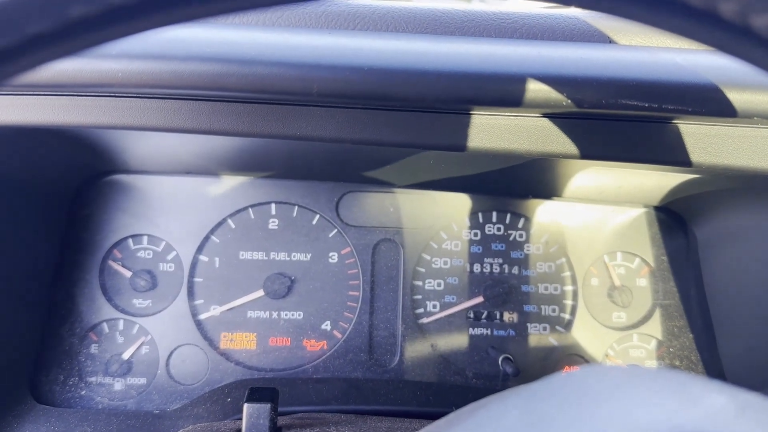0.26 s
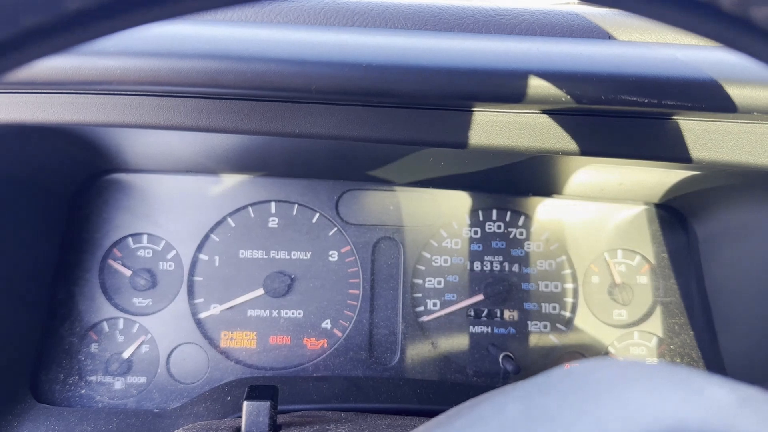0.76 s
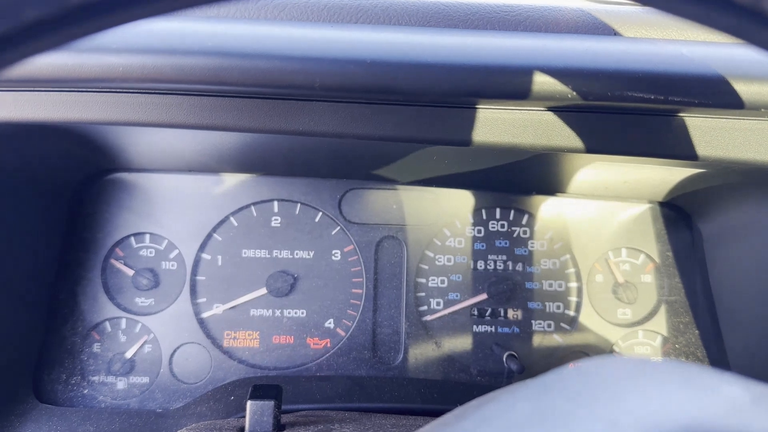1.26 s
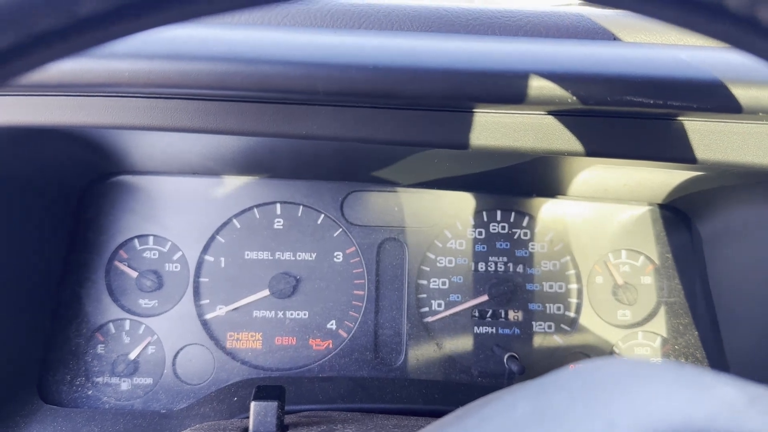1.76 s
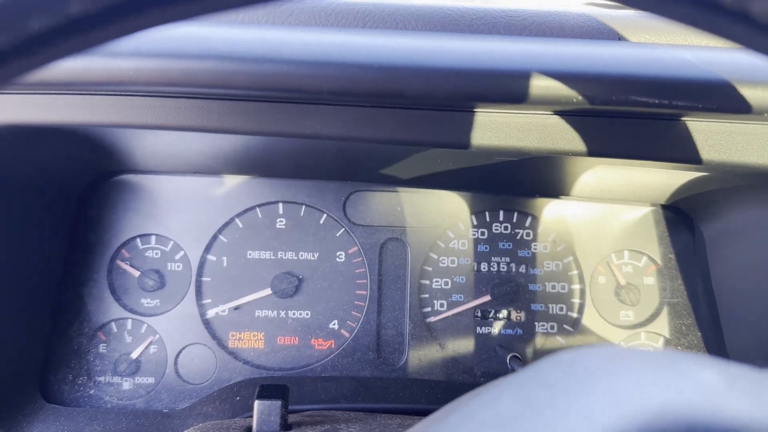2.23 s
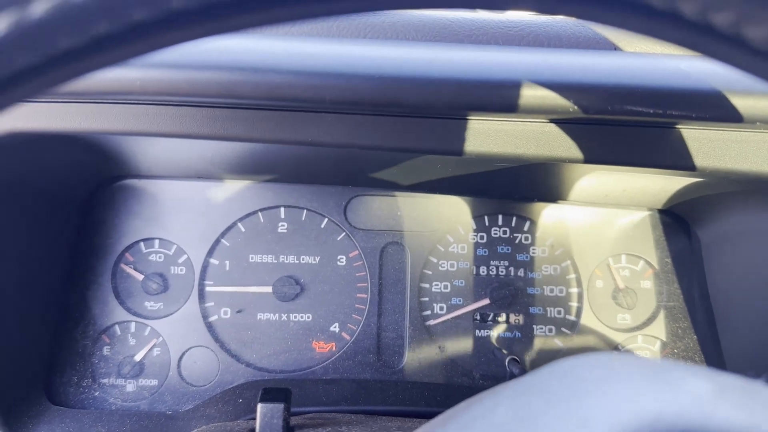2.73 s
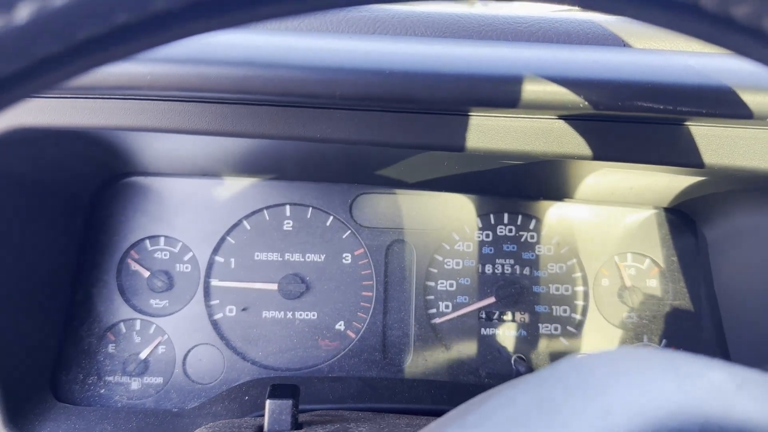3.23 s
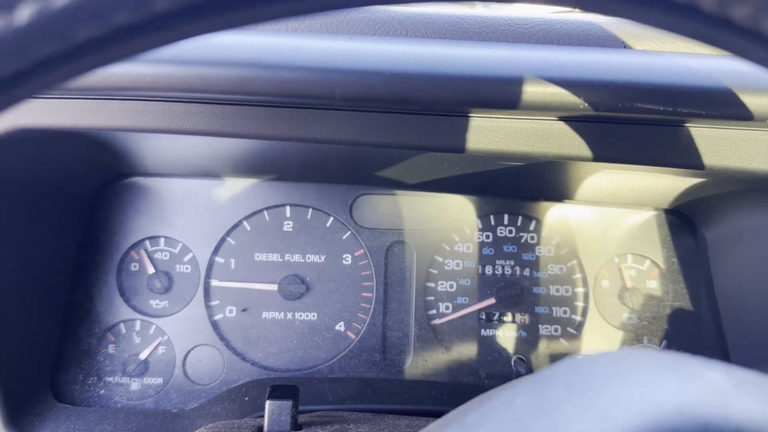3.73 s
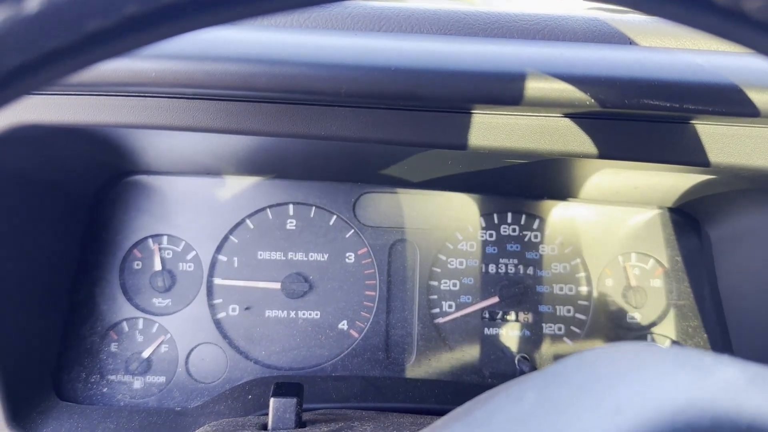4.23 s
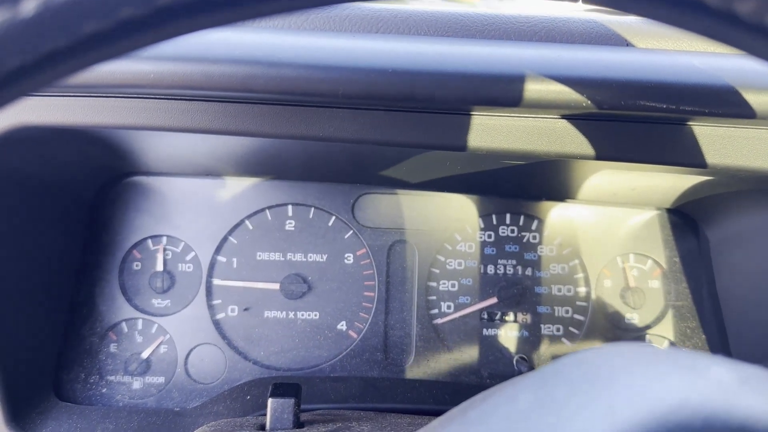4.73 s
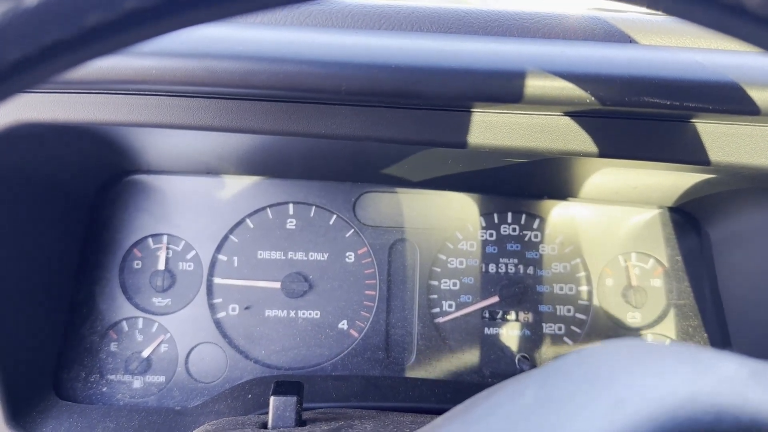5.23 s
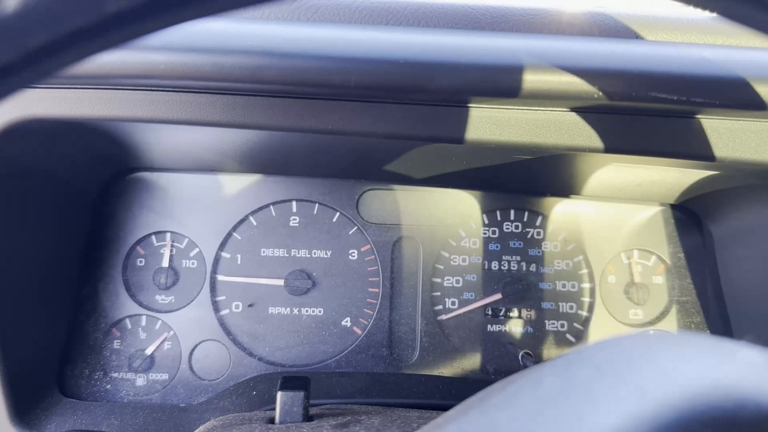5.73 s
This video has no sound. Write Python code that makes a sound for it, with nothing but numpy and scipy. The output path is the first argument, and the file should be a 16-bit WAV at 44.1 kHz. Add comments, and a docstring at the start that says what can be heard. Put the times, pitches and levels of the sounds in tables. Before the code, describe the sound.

Inside a truck cab, a key clicks, the starter grinds, and a diesel engine catches and settles into a steady, clattering idle.

```python
"""Diesel start from the cab

A quiet truck cab, birds outside. The key clicks round, the starter gear grinds against each compression,
a six-cylinder diesel catches with a few hard blows and settles to an even idle. Firings ring the cab's
modes; clatter and hiss come through the firewall to a pair of microphone ports."""
import sys
import numpy as np
from scipy import signal
from scipy.fft import rfft, irfft, next_fast_len
from scipy.io import wavfile
from scipy.ndimage import uniform_filter1d

SR = 44100
rng = np.random.default_rng(int(sys.argv[2]) if len(sys.argv) > 2 else 0)


def output_pcm(signal):
    """Save a mono or channel-first signal as 16-bit PCM at the path in sys.argv[1].

    Samples are clipped to [-1, 1] before scaling.
    """
    pcm = np.clip(np.atleast_2d(signal).T, -1, 1) * 32767
    wavfile.write(sys.argv[1], SR, np.round(pcm).astype(np.int16))


N = 263718
T = np.arange(N) / SR

# first uneven firings: t/s, level/dB
CATCH = [(2.108, -5), (2.16, 2), (2.203, 3.5), (2.225, 2), (2.245, -6), (2.266, 0.5), (2.297, 3.5),
         (2.327, -5), (2.366, 2)]
# idle speed: t/s, firing rate/Hz
IDLE = [(2.441, 32.63), (3.2, 33.04), (4.1, 33.0), (4.9, 33.155), (5.98, 33.162)]
# cylinders in firing order: cab blow/dB, dash blow/dB, clatter/dB
CYLINDERS = [(3, 2, -2), (2.1, 3.5, -7), (3.5, -5.5, 0.5), (0, 3.5, 0), (5.5, -1, -3), (0, -5.5, -0.5)]
FIRE_S, IDLE_S = 2.11, IDLE[0][0]

def engine():
    """Six cylinders catch, then idle; each firing pulses the cab, the dash and the clatter."""
    rate_hz = np.interp(T, *np.transpose(IDLE))
    firings = np.cumsum(rate_hz * (T >= IDLE_S)) / SR
    count = np.floor(firings - 1e-9).astype(int)
    at = np.flatnonzero(np.diff(count)) + 1
    spread_db = np.array([.5, .7, 1.2]) * rng.standard_normal((len(at), 3))
    pulses = np.zeros((3, N))
    pulses[:, at] = amp(np.array(CYLINDERS)[count[at] % 6] + spread_db).T
    for s, db in CATCH:
        pulses[:, round(s * SR)] = amp(db)
    cab_blows, dash_blows, clatter_blows = pulses
    body = thump(cab_blows, dash_blows, idle_mean=dash_blows[at].mean())
    noise = combustion(clatter_blows, cycles=np.cumsum(rate_hz) / SR / 6)
    return body + noise + valve_taps(firings) + bark()


# cab, dash and floor pan modes: f/Hz, width/Hz, gain/dB
CAB_MODES = [(70.04, 13.2, -20.5), (99.84, 10.4, -26), (134.52, 1.9, -27.5), (174.4, 11.8, -33.5),
             (198, 7.1, -43.5), (235.8, 18, -44.5)]
DASH_MODES = [(372, 2.3, -42.5), (399.3, 2.85, -39.5)]
FLOOR_MODES = [(86, 7, -22), (181, 7, -31)]
THUMP_DB = -18.5

def thump(cab_blows, dash_blows, idle_mean):
    """Firings ring cab and dash; only their unevenness rings the floor pan."""
    uneven = dash_blows - (dash_blows > 0) * idle_mean
    body = ring(cab_blows, CAB_MODES) + ring(dash_blows, DASH_MODES) + ring(uneven, FLOOR_MODES)
    return amp(THUMP_DB) * body


# clatter and hiss spectra: f/Hz, relative density/dB
CLATTER_SPECTRUM = [(71, -29.5), (120, -4), (268, -17.5), (396, -16.5), (541, -24), (680, -22),
                    (975, -26.5), (1090, -25), (1250, -26.5), (1940, -26.5), (3170, -38), (6000, -53),
                    (7800, -75)]
HISS_SPECTRUM = [(2350, -7), (4000, -3.5), (5110, -3.5), (6140, -8.5), (7120, -3), (8600, -9), (10400, -7),
                 (15700, -12)]
# panel resonances: f/Hz, width/Hz, boost/dB
PANELS = [(395, 40, 4.5), (684, 36, 5), (805, 16, 4), (1115, 45, 6), (1550, 55, 4.5), (1900, 150, 5),
          (2310, 40, 5.5), (2570, 70, 6), (5030, 110, 6), (6860, 130, 2)]
# noise flares at the catch: t/s, clatter/dB, hiss/dB
FLARES = [(2.25, -26, -42.5), (2.38, -33, -45)]
CLATTER_DB, HISS_DB, KNOCK_DB = -30, -52, -24.5
CLATTER_FADE_DB_PER_S, HISS_FADE_DB_PER_S = 0.86, 2.5  # noise eases as oil pressure builds

def combustion(blows, cycles):
    """Each firing opens a burst of clatter and hiss; the first ones also knock hard."""
    flare_s, clatter_db, hiss_db = np.transpose(FLARES)
    clatter_gain = flare(flare_s, clatter_db, CLATTER_DB, CLATTER_FADE_DB_PER_S)
    hiss_gain = flare(flare_s, hiss_db, HISS_DB, HISS_FADE_DB_PER_S)
    bursts = decay(blows, tau_s=0.044)
    beat = (1.146 + bursts) / np.sqrt(uniform_filter1d((0.5 + bursts) ** 2, size=8000))
    clatter = clatter_gain * colour(beat * grit(0.37, cycles), CLATTER_SPECTRUM, PANELS[:-1])
    hiss = hiss_gain * colour((6.4 + beat) / 5 * grit(0.75), HISS_SPECTRUM, PANELS[-2:])
    first_bursts = decay(blows * (T < IDLE_S), tau_s=0.01)
    knock = amp(KNOCK_DB) * colour(first_bursts * grit(2.0), CLATTER_SPECTRUM[2:], PANELS[:-1])
    running = swell(FIRE_S, 0, rise_db_per_s=280, fall_db_per_s=0)
    return knock + running * (clatter + hiss)


def flare(times_s, peaks_db, idle_db, fade_db_per_s, rise_db_per_s=54, fall_db_per_s=145):
    """Engine noise gain: brief flares, then a slow fade from the idle level."""
    power = sum(swell(s, db, rise_db_per_s, fall_db_per_s) ** 2 for s, db in zip(times_s, peaks_db))
    idle = swell(times_s[-1], idle_db, rise_db_per_s, fade_db_per_s)
    return np.sqrt(power + idle ** 2)


# bark modes: f/Hz, width/Hz, level/dB
BARK_MODES = [(203, 40, -18), (900, 200, -23)]

def bark():
    """The first firing rings two short modes."""
    return strike(times_s=2.113, db=0, modes=BARK_MODES)


# valve taps: place in cycle/firings, f/Hz, level/dB
TAPS = [(.3, 1920, -39), (.15, 1130, -41), (2.05, 695, -36), (5.45, 1550, -41)]
TAP_WIDTH_HZ = 30

def valve_taps(firings):
    """Each valve gear tap rings once a cycle and fades with the clatter."""
    out = np.zeros(N)
    for place, hz, db in TAPS:
        times_s = T[np.flatnonzero(np.diff(np.floor((firings - place) / 6)))]
        tap_db = db - CLATTER_FADE_DB_PER_S * (times_s - FIRE_S) + 2.5 * rng.standard_normal(len(times_s))
        out += strike(times_s, tap_db, [(hz, TAP_WIDTH_HZ, 0)])
    return out


# pinion ring on meshing: f/Hz, width/Hz, level/dB
PINION_MODES = [(4570, 42, -40)]
ENGAGE_S, RELEASE_S = .933, 2.2

def starter():
    """The pinion meshes with a ping, then grinds and whines until let go."""
    meshed = swell(ENGAGE_S, 0, rise_db_per_s=916, fall_db_per_s=0)
    meshed *= np.clip((RELEASE_S - T) / 0.011, 0, 1)
    load = meshed * swell(s=1.235, db=-39.5, rise_db_per_s=16, fall_db_per_s=260)
    return grind(meshed, load) + whine(load) + strike(ENGAGE_S, 0, PINION_MODES)


# compression strokes: t/s, level/dB, hold/s
STROKES = [(0.929, -42, 0.403), (1.358, -33, 0.057), (1.502, -32.5, 0.051), (1.639, -31.5, 0.036),
           (1.762, -31.5, 0.04), (1.883, -32.5, 0.046), (2.014, -39, 0.03)]
# gear noise: f/Hz, relative density/dB
GRIND_SPECTRUM = [(180, -25.5), (300, -10.5), (397, -2), (530, -18.5), (621, -1.5), (1020, -8.5),
                  (1150, -5), (1310, -12.5), (1680, -5), (1820, -7), (3090, -16.5), (4920, -16.5),
                  (5710, -24.5), (10700, -30), (15700, -30.5)]
# bell housing resonances: f/Hz, width/Hz, boost/dB
HOUSING = [(578, 34, 5), (1110, 30, -3), (1574, 73, 6.5), (1993, 100, 7.5), (5050, 97, 9), (10050, 2100, 7)]
# ring at a stroke's hardest point: f/Hz, width/Hz, level re stroke/dB
CRUNCH_MODES = [(1653, 48, 3), (2030, 74, 0), (4950, 130, -13)]
# slack taken up as a stroke starts: f/Hz, width/Hz, gain/dB
CLACK_MODES = [(627, 40, -3), (1120, 33, -10)]
DRAG_DB, LABOUR_GAIN_DB, CLACK_GAIN_DB, TOOTH_HZ = -43, 4, 5, 127
BITE_S, PEAK_DELAY_S, PEAK_WIDTH_S, LET_GO_S = 0.0036, .028, 0.0055, 0.015

def grind(meshed, load):
    """Teeth drag in the bell housing and bite hard against each compression."""
    power = (meshed * amp(DRAG_DB)) ** 2 + (load * amp(LABOUR_GAIN_DB)) ** 2
    clacks = np.zeros(N)
    for s, db, hold_s in STROKES:
        age_s = np.maximum(T - s, 0)
        bite = np.minimum(age_s / BITE_S, 1)
        peak = 1 + np.exp(-((age_s - PEAK_DELAY_S) / PEAK_WIDTH_S) ** 2)
        let_go = np.exp(-np.maximum(age_s - hold_s, 0) / LET_GO_S)
        power += amp(db) ** 2 * bite * peak * let_go
        clacks[round(s * SR)] = amp(db + CLACK_GAIN_DB) / CLACK_MODES[0][1]
    teeth = np.cumsum(TOOTH_HZ * flutter(4.1, 400)) / SR
    tooth_pulses = unit_rms(.6 + np.exp(-(teeth % 1) / .35))
    grinding = colour(np.sqrt(power) * tooth_pulses * grit(0.26), GRIND_SPECTRUM, HOUSING)
    stroke_s, stroke_db, _ = np.transpose(STROKES)
    crunch = strike(stroke_s + PEAK_DELAY_S, stroke_db, CRUNCH_MODES)
    return grinding + ring(clacks, CLACK_MODES) + crunch


# whine partials: frequency ratio, level/dB
WHINE_PARTIALS = [(1, 0), (2, -6), (2.55, -6), (3, -8)]
WHINE_HZ, SAG_HZ_PER_S = 672, 140
RACE_RISE_HZ, RACE_S, RACE_WIDTH_S = 318, 1.165, .06

def whine(load):
    """The starter's pitch sags, racing over the first top dead centre; loudest as the load returns."""
    sag_hz = SAG_HZ_PER_S * np.clip(T - ENGAGE_S, 0, 1)
    race_hz = RACE_RISE_HZ * np.exp(-abs((T - RACE_S) / RACE_WIDTH_S) ** 3)
    gain = load * flutter(9, 500, (2, N))
    cycles = np.cumsum((WHINE_HZ - sag_hz + race_hz) * flutter(0.18, 300)) / SR
    return gain * sum(amp(db) * np.sin(2 * np.pi * ratio * cycles) for ratio, db in WHINE_PARTIALS)


# block lurches: t/s, level/dB
LURCHES = [(1.085, -24), (1.58, -25.5), (1.88, -26.5), (2.27, -15)]
# rumble envelope: t/s, level/dB
RUMBLE_LEVELS = [(.94, -40), (1.01, -24.5), (1.17, -35.5), (1.33, -36), (1.58, -30), (2.2, -30.5),
                 (2.27, -13.5), (2.45, -31), (2.62, -42)]
# block rumble: f/Hz, relative density/dB
RUMBLE_SPECTRUM = [(60, -0.5), (86, -5), (146, -6), (215, -15.5), (318, -18.5), (420, -26.5), (550, -45),
                   (920, -120)]
ROCK_HZ = 49.4

def block():
    """The block rocks on its mounts and rumbles while it cranks and catches."""
    lurch = (T > ENGAGE_S) * sum(swell(s, db, rise_db_per_s=84, fall_db_per_s=88) for s, db in LURCHES)
    drift_rad = np.cumsum(0.015 * rng.standard_normal(N))
    rocking = lurch * np.sqrt(2) * np.sin(2 * np.pi * ROCK_HZ * T + drift_rad)
    s, db = np.transpose(RUMBLE_LEVELS)
    gate = np.clip(np.minimum(T - s[0], s[-1] - T) / .01, 0, 1)
    rumble = amp(np.interp(T, s, db)) * colour(rng.standard_normal((2, N)), RUMBLE_SPECTRUM)
    return rocking + gate * rumble


# key clicks: t/s, level/dB
CLICKS = [(0.639, -64.5), (0.751, -41), (0.777, -50.5), (0.845, -54), (0.867, -48), (0.914, -60.5)]
# lock scrape: f/Hz, relative density/dB
LOCK_SPECTRUM = [(180, -45), (300, -10.5), (627, -11.5), (1730, -15.5), (3920, -30.5), (10300, -36.5)]
# lock resonances: f/Hz, width/Hz, boost/dB
LOCK_MODES = [(636, 90, 12), (845, 66, 8), (1710, 180, 8), (2350, 74, 9)]

def key_clicks():
    """Each click is a short dry scrape coloured by the lock."""
    scrape = np.zeros(N)
    for s, db in CLICKS:
        age_s = np.maximum(T - s, 0)
        tail = np.exp(-age_s / 0.0098) + 0.18 * np.exp(-age_s / 0.043)
        scrape += amp(db) * np.minimum(age_s / 0.0041, 1) * tail
    return colour(scrape * grit(1.0), LOCK_SPECTRUM, LOCK_MODES)


# key jingles: t/s, level/dB, f/Hz
JINGLES = [(0.993, -40, 6800), (2.385, -42, 7240), (2.562, -34, 5220), (2.705, -44, 10400),
           (2.992, -38.5, 11300), (3.261, -45, 7160), (3.634, -41, 4750), (5.335, -45.5, 6900)]
JINGLE_T60_S = .06

def key_jingles():
    """Loose keys ping with a puff of rattle as the cab shakes."""
    out, t = np.zeros((2, N + SR)), T[:SR // 8]
    for s, db, hz in JINGLES:
        rattle = rng.standard_normal((2, len(t)))
        ping = (.6 + 5 * uniform_filter1d(rattle, size=40)) * np.sin(2 * np.pi * hz * t)
        envelope = amp(db - 60 * t / JINGLE_T60_S) * np.minimum(t / .003, 1)
        start = round(s * SR)
        out[:, start:start + len(t)] += envelope * (ping + .55 * rattle)
    return out[:, :N]


# whistles: t/s, length/s, start f/Hz, end f/Hz, level/dB
WHISTLES = [(-.2, 0.46, 3320, 2840, -77.5), (0.336, .11, 4700, 4570, -76), (0.566, 0.45, 3320, 3000, -76)]

def birds():
    """Faint whistles through shut doors; each swells, bends down and fades."""
    out = np.zeros((2, N))
    for s, length_s, from_hz, to_hz, db in WHISTLES:
        progress = np.clip((T - s) / length_s, 0, 1)
        hz = from_hz + (to_hz - from_hz) * progress ** 1.9
        envelope = amp(db) * abs(np.sin(np.pi * progress ** 1.1)) ** 1.8
        out += envelope * flutter(16, 250, (2, N)) * np.sin(2 * np.pi * np.cumsum(hz) / SR)
    return out


# hum in the still cab: f/Hz, relative density/dB
HUM_SPECTRUM = [(25, -5), (60, -6), (119, 4.5), (160, -14.5), (260, -11), (330, -26), (900, -32.5),
                (1700, -26), (3500, -42.5), (8100, -48), (15500, -47)]
HUM_DB = -60

def outdoor_hum():
    """Steady low noise through shut doors."""
    return amp(HUM_DB) * colour(rng.standard_normal((2, N)), HUM_SPECTRUM)


def amp(db):
    """dB to gain."""
    return 10 ** (np.asarray(db) / 20)


def unit_rms(x):
    """Scales to rms 1."""
    return x / np.sqrt(np.mean(x ** 2) + 1e-20)


def log_interp(points, hz):
    """Interpolates on a log-frequency axis."""
    f, value = np.transpose(points)
    return np.interp(np.log(hz + 1), np.log(f + 1), value)


def swell(s, db, rise_db_per_s, fall_db_per_s):
    """Gain peaking at time s, with slopes linear in dB."""
    return amp(db - np.where(T < s, rise_db_per_s * (s - T), fall_db_per_s * (T - s)))


def decay(blows, tau_s):
    """Gives each blow an exponential tail."""
    return signal.lfilter([1], [1, -np.exp(-1 / (tau_s * SR))], blows)


def flutter(scale, window_samples, shape=N):
    """Smoothed random factor around 1."""
    return 1 + scale * uniform_filter1d(rng.standard_normal(shape), size=window_samples)


def grit(grain_db, cycles=None, repeat_share=.55):
    """Two noise rows whose level jumps each millisecond; given cycles, a share repeats every cycle."""
    grain = np.repeat(rng.standard_normal(N // 44 + 1), 44)[:N]
    noise = rng.standard_normal((2, N)) * amp(grain_db * grain)
    if cycles is not None:
        repeating = noise[:, (cycles % 1 * 8000).astype(int)]
        noise = np.sqrt(repeat_share) * repeating + np.sqrt(1 - repeat_share) * noise
    return unit_rms(noise)


def colour(x, spectrum, peaks=()):
    """Minimum-phase filter from a spectrum plus resonances; white noise keeps its rms."""
    hz = abs(np.fft.fftfreq(16384, 1 / SR))
    boost_db = sum(db / (1 + (2 * (hz - f) / width) ** 2) for f, width, db in peaks)
    log_gain = np.log(amp(log_interp(spectrum, hz) + boost_db))
    taps = np.fft.ifft(np.exp(np.conj(signal.hilbert(log_gain)))).real[:8192]
    return signal.oaconvolve(x, taps[None] / np.linalg.norm(taps), axes=1)[:, :N]


def ring(blows, modes):
    """Blows ring damped modes, neighbours in opposite polarity."""
    t = T[:SR // 3]
    body = sum(-(-1) ** k * amp(db) * width * np.exp(-np.pi * width * t) * np.sin(2 * np.pi * hz * t)
               for k, (hz, width, db) in enumerate(modes))
    return signal.oaconvolve(blows, body)[:N]


def strike(times_s, db, modes):
    """Single blows; each mode peaks at db plus its own level."""
    blows = np.zeros(N)
    blows[np.round(np.asarray(times_s) * SR).astype(int)] = amp(db)
    return ring(blows, [(hz, width, level - 20 * np.log10(width)) for hz, width, level in modes])


# port likeness: f/Hz, coherence/0-1
PORT_COHERENCE = [(60, 1), (200, .98), (250, 0.84), (500, 0.63), (4000, 0), (8000, 0.72)]
# port phase: f/Hz, left lead/rad
PORT_LEAD = [(0, 0), (110, .17), (430, .7), (690, 3.9), (1030, 2.6), (1810, 4.5), (2070, 6.3), (2500, 5.2),
             (3300, 7.9), (4650, 6.5), (7800, 7.6), (9800, 6.4)]
# port balance: f/Hz, left minus right/dB
PORT_BALANCE = [(60, 2), (200, 4), (380, 2), (700, 5), (1290, 6), (4400, 10), (9000, 5.5), (15000, -3)]

def scene():
    """All sources reach two ports that are partly alike, unevenly loud and out of step."""
    mix = outdoor_hum() + birds() + key_jingles() + key_clicks() + starter() + block() + engine()
    size = next_fast_len(N)
    hz = np.fft.rfftfreq(size, 1 / SR)
    first, second = rfft(mix, size)
    coherence = np.clip(log_interp(PORT_COHERENCE, hz), 0, 1)
    left = amp(log_interp(PORT_BALANCE, hz) / 2)
    right_shared = coherence * np.exp(-1j * log_interp(PORT_LEAD, hz)) / left
    right_own = np.sqrt(1 - coherence ** 2) / left
    mid_gain = np.sqrt(abs(left + right_shared) ** 2 + right_own ** 2) / 2
    ports = np.array([left * first, right_shared * first + right_own * second])
    return irfft(ports / mid_gain, size)[:, :N]


LOW_CUT_HZ, HIGH_CUT_HZ = 28, 15800

def record(dry):
    """The microphone loses the deepest bass and the top treble."""
    thin = signal.sosfilt(signal.butter(2, LOW_CUT_HZ, "high", fs=SR, output="sos"), dry)
    lowpass = signal.firwin(1023, HIGH_CUT_HZ, window=("kaiser", 9), fs=SR)
    return signal.oaconvolve(thin, lowpass[None], "same")


dry = scene()
out = record(dry)
output_pcm(out)
```